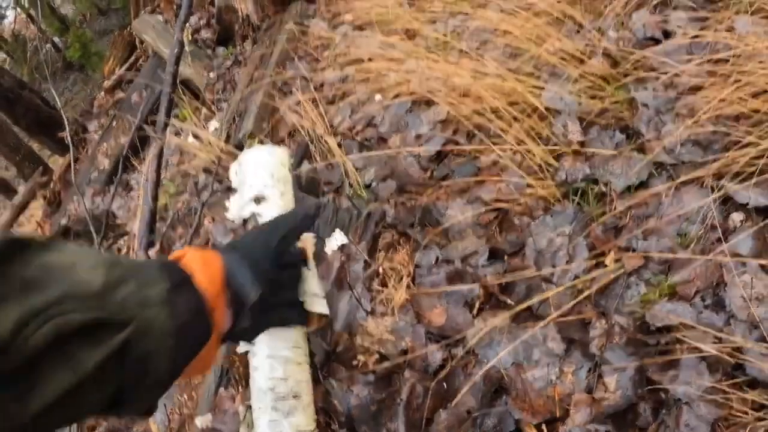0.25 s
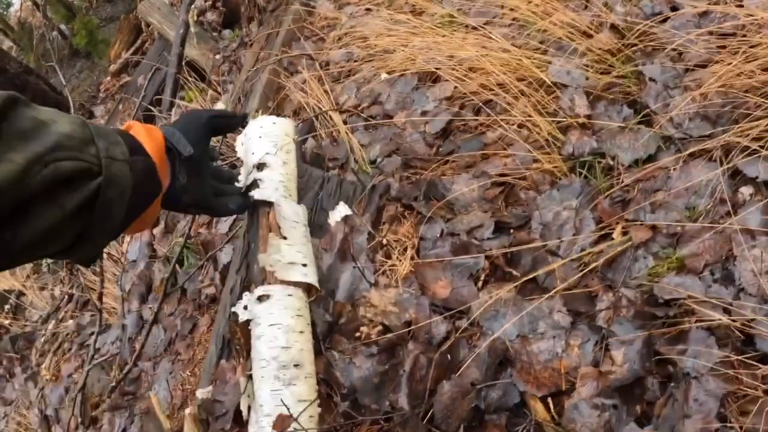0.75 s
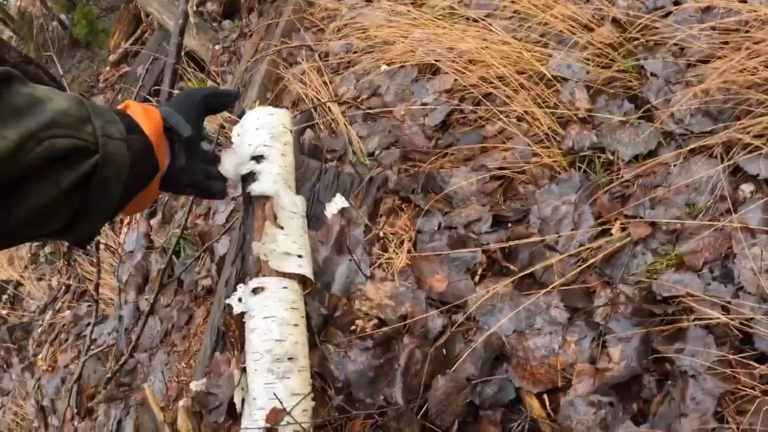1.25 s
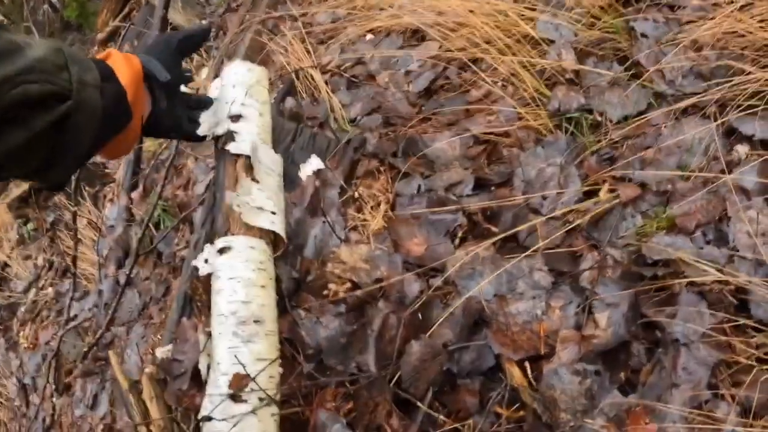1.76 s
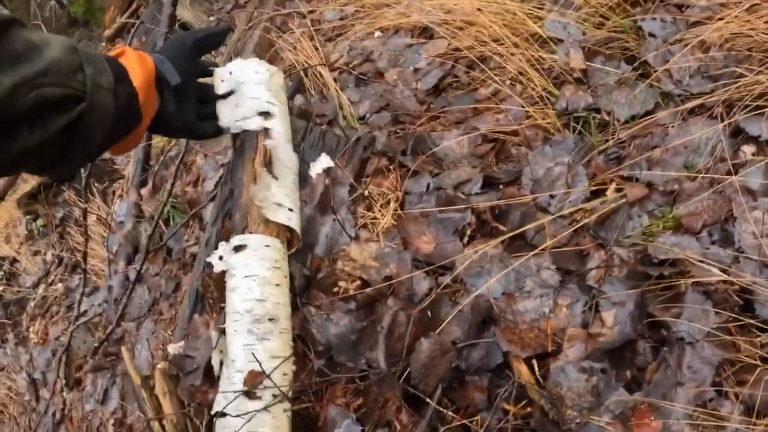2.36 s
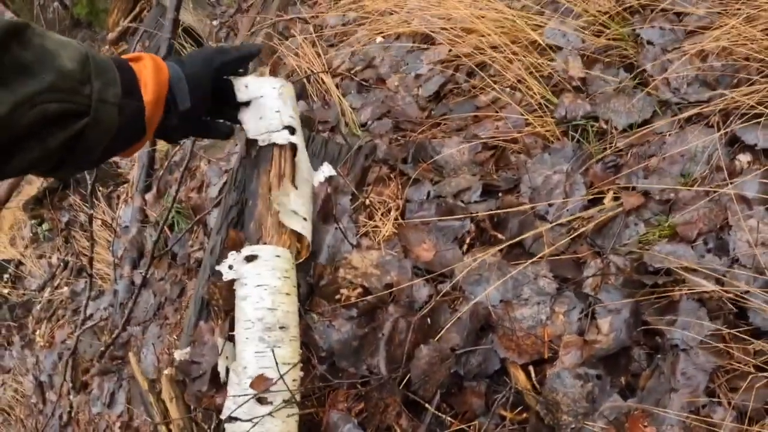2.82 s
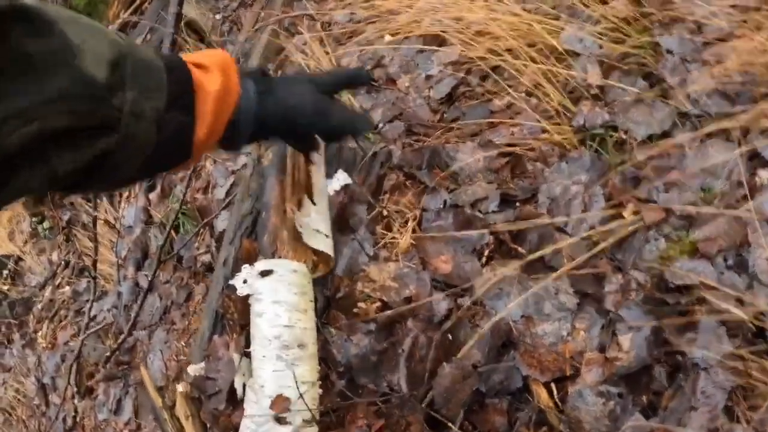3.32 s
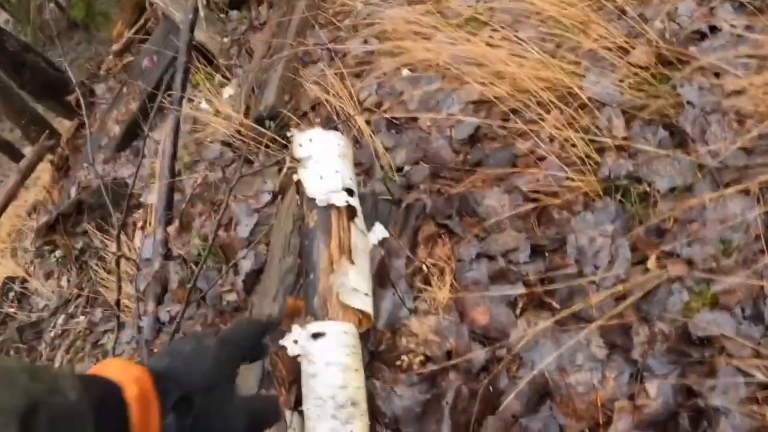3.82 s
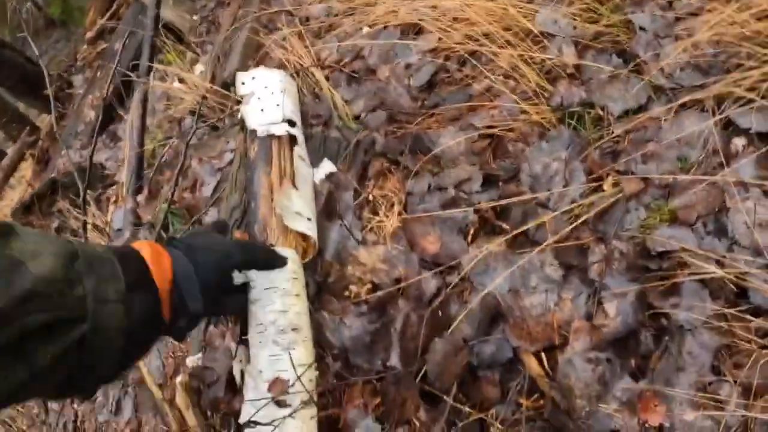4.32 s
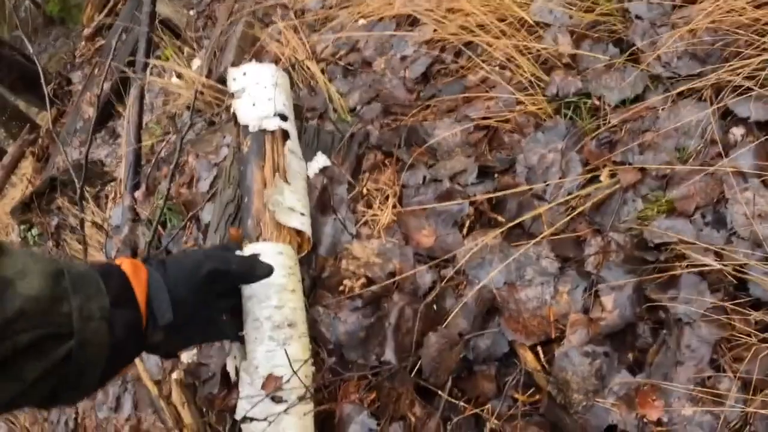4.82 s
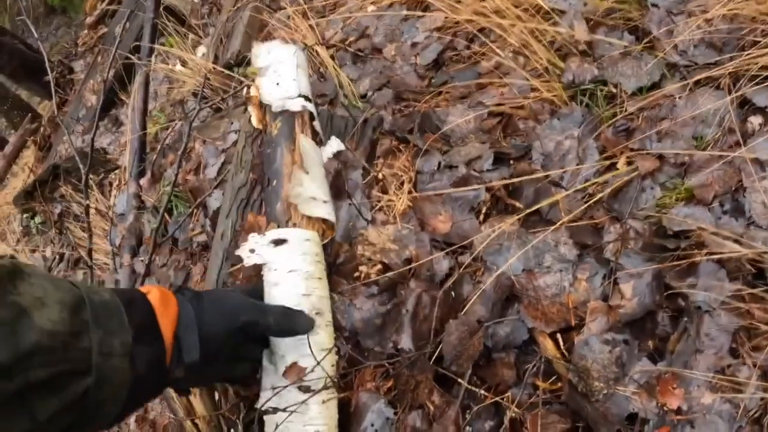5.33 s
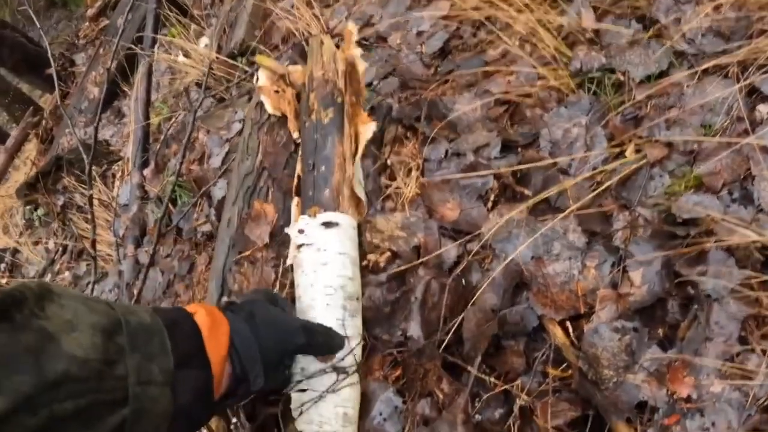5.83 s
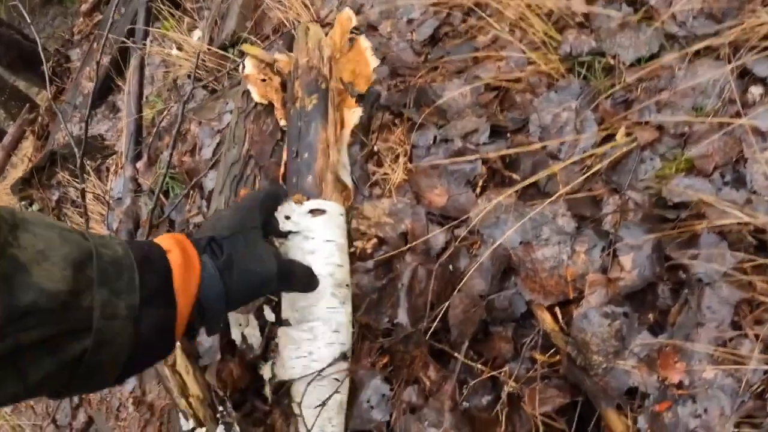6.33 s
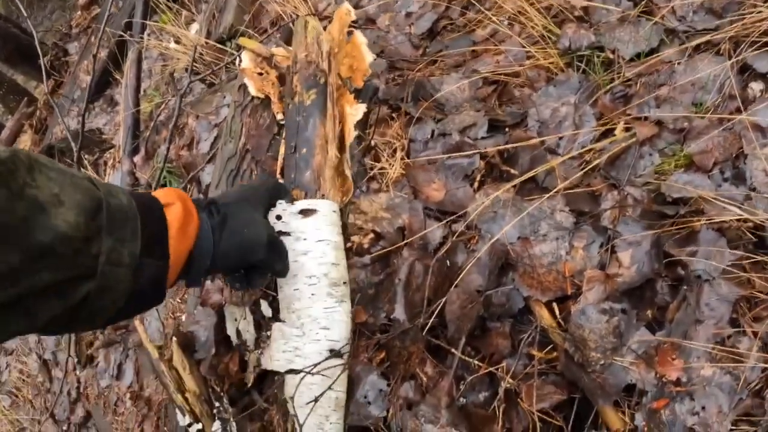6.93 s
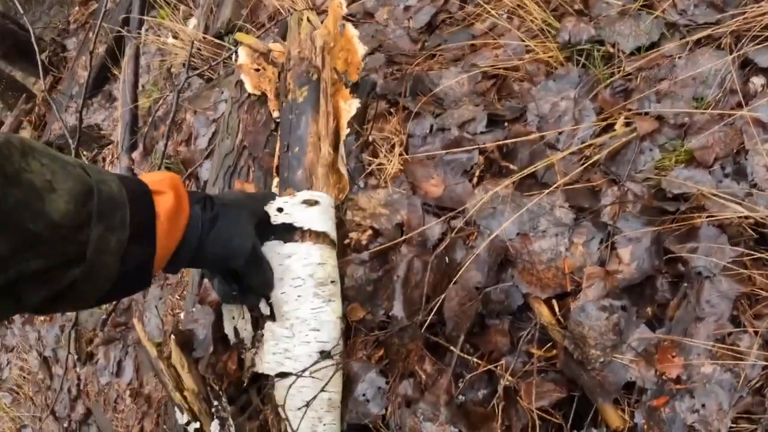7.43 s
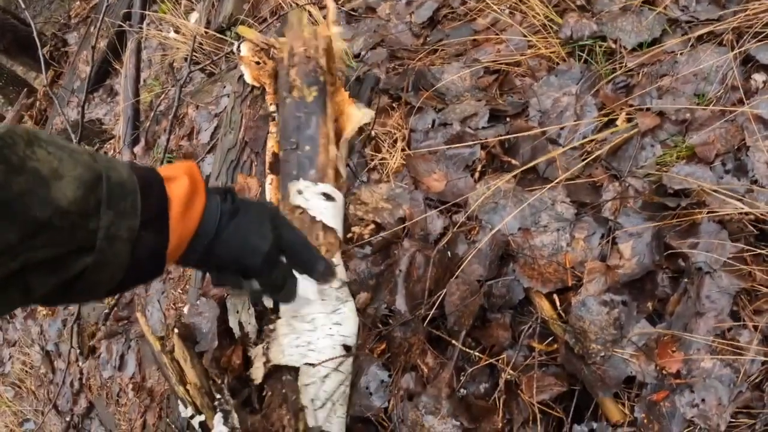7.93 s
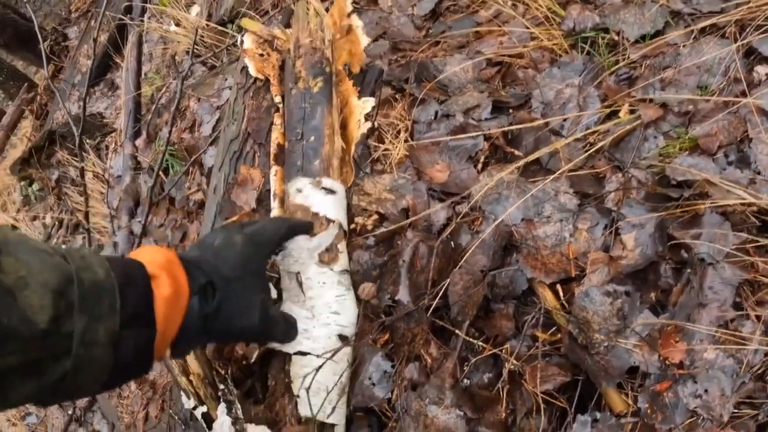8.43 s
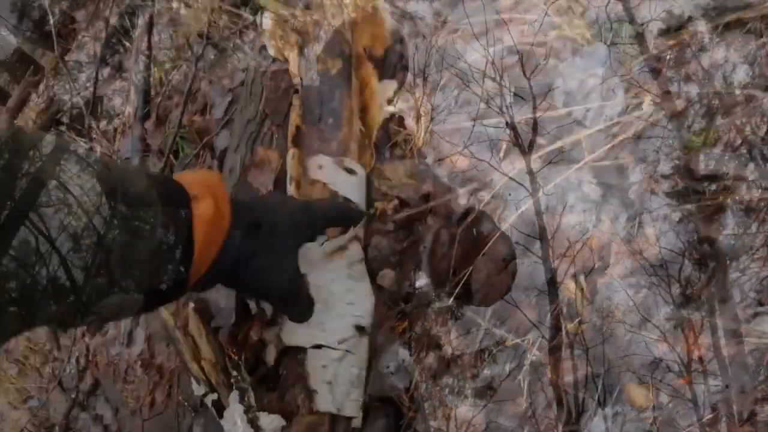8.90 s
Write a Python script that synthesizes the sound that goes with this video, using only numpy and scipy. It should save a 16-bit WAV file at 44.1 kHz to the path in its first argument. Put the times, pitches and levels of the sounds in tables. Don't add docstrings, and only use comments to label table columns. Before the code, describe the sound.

Dry papery bark is tugged, then ripped from a rotten branch in sharp crackling snaps, with sleeve swishes and low wind rumble.

```python
import sys
import numpy as np
from scipy import signal
from scipy.fft import rfft, irfft
from scipy.io import wavfile
from scipy.ndimage import uniform_filter1d

SR = 44100
rng = np.random.default_rng(int(sys.argv[2]) if len(sys.argv) > 2 else 0)


def nominal_scale(level):
    x = np.asarray(level, float) / 20
    return 10 ** x


def store_wav(level_fs):
    pcm = np.round(np.clip(np.atleast_2d(level_fs), -1, 1) * 32767)
    wavfile.write(sys.argv[1], SR, pcm.T.astype(np.int16))


N = 403956

# frequency in Hz, likeness from 0 to 1.
CLOTH_LIKENESS = [(60, 0.88), (240, 0.99), (950, 0.53), (3770, 0.21), (15000, 0.078)]
# fastest moment in seconds, swish level in dB, build-up in seconds,
# let-go in seconds.
ARM_REACHES = [(0.0, -50, .1, 0.3), (.4, -53.5, 0.5, 0.22), (.62, -53, 0.19, 0.5), (.81, -47.5, 0.38, 0.12),
               (1.59, -48, 0.19, 0.69), (1.74, -57.5, .25, 0.051), (1.92, -62, .06, .05),
               (2.28, -68, 0.083, 0.072), (3.5, -54, 0.28, 0.34), (3.79, -44, 0.34, 0.18),
               (4.42, -54.5, 0.34, .05)]


def evened(x):
    return x / np.sqrt(np.mean(x ** 2) + 1e-20)


def read(points, hz):
    f, value = np.transpose(points)
    return np.interp(np.log(hz + 1), np.log(f + 1), value)


def add(mix, s, sound):
    part = mix[max(round(s * SR), 0):][:len(sound)]
    part += sound[:len(part)]


def band(x, lo_hz, hi_hz):
    limits = np.clip([lo_hz, hi_hz], 20, SR / 2.2)
    return signal.sosfilt(signal.butter(2, limits, "band", fs=SR, output="sos"), x)


def noise(spectrum, likeness, size, patchy_db):
    hop = size // 4
    hz = np.fft.rfftfreq(size, 1 / SR)
    a, b, c, d, patches = rng.standard_normal((N // hop + 5, len(hz), 5)).T
    patches = uniform_filter1d(patches, size=5, axis=0)
    patches = evened(uniform_filter1d(patches, size=9, axis=1))
    same = np.clip(read(likeness, hz), 0, 1)[:, None]
    left = a + 1j * b
    right = same * left + np.sqrt(1 - same ** 2) * (c + 1j * d)
    z = np.array([left, right]) * nominal_scale(read(spectrum, hz)[:, None] + patchy_db * patches)
    return evened(signal.istft(z, nperseg=size, noverlap=size - hop)[1][:, :N])


def ports(x):
    # frequency in Hz, left minus right in dB.
    tilt = [(1000, 0), (4500, -.3), (8500, 3.2), (14000, 0)]
    lean = nominal_scale(read(tilt, np.fft.rfftfreq(N, 1 / SR)) / 2)
    return irfft(rfft(x) * np.array([lean, 1 / lean]), N)


def gestures(rows):
    reach_over = 1.466
    roundness = 2.04
    t = np.arange(0, N + 128, 64) / SR
    s, db, up, down = np.transpose(rows)[:, :, None]
    away = np.maximum((s - t) / up, (t - s) / down)
    left = np.clip(1 - away / reach_over, 1e-3, 1)
    strongest = (db + 20 * roundness * np.log10(left)).max(0)
    return np.interp(np.arange(N) / SR, t, strongest)


def hand():
    # hardest moment in seconds, scrape level in dB,
    # build-up in seconds, let-go in seconds.
    tugs = [(0.0, -35, .01, 0.013), (.383, -47, 0.13, 0.056), (.73, -65, 0.24, 0.048),
            (1.1, -55, 0.18, 0.15), (1.124, -34.5, 0.0065, 0.0083), (1.355, -57, 0.097, 0.042),
            (1.531, -56, .04, .05), (1.71, -51.5, 0.19, 0.063), (1.87, -51.5, 0.018, 0.15),
            (2.295, -52, 0.045, 0.094), (2.486, -49, 0.17, 0.14), (2.784, -51, 0.14, 0.13),
            (2.941, -44.5, 0.027, 0.081), (3.06, -58.5, .1, 0.098), (3.28, -47.5, 0.011, .02),
            (3.325, -47, 0.047, 0.048), (3.39, -52.5, .02, .04), (3.47, -54.5, 0.79, 0.16),
            (3.622, -49, 0.2, 0.054), (3.74, -50.5, 0.041, 0.36), (4.446, -47, 0.037, 0.062)]
    # hardest moment in seconds, scrape level in dB,
    # build-up in seconds, let-go in seconds.
    pulls = [(4.536, -42, 0.068, 0.34), (4.712, -43, 0.25, 0.02), (4.941, -44, 0.2, 0.13),
             (5.103, -34.5, 0.028, 0.018), (5.204, -37.5, 0.15, 0.43), (5.41, -36, 0.086, 0.059),
             (5.497, -34.5, 0.013, 0.01), (5.61, -34.5, 0.14, 0.085), (5.743, -36, 0.14, 0.21),
             (5.945, -41, 0.045, .015), (5.996, -42, 0.19, 0.15), (6.114, -38, 0.18, 0.12),
             (6.244, -37, 0.14, 0.057), (6.34, -48, 0.24, 0.065), (6.56, -50.5, 0.87, 0.07),
             (6.634, -42, 0.084, 0.064), (6.896, -38, 0.099, 0.052), (7.022, -43, 0.32, 0.2),
             (7.215, -37.5, 0.1, 0.15), (7.337, -38, 0.054, 0.016), (7.445, -48.5, 0.045, 0.65),
             (7.66, -43, 0.098, 0.19), (7.9, -43.5, 0.42, 0.2), (8.02, -38.5, .18, 0.31),
             (8.252, -41.5, 0.11, 0.18), (8.453, -49.5, 0.12, 0.12), (8.685, -47.5, 0.008, 0.13),
             (8.75, -45.5, 0.068, 0.076), (8.95, -50.5, 0.32, 0.29), (9.084, -41, 0.054, 0.16)]
    return nominal_scale(gestures(tugs + pulls))


def breaks():
    # start in seconds, peak in dB, ring in Hz, time to fade 60 dB in seconds,
    # sizzle in dB, dull part in dB (both relative to the peak).
    first_snap = (0.0, -14.5, 2306, -0.5, -9, -4)
    # start in seconds, peak in dB,
    # ring in Hz, time to fade 60 dB in seconds, sizzle in dB relative to the peak.
    thin_flakes = [(1.0562, -25, 5760, 0.0058, -28), (1.0615, -22, 3600, 0.005, -22),
                   (1.0839, -26.5, 3160, 0.01, -36), (1.0941, -10.5, 3260, 0.017, -35),
                   (1.1413, -17, 1920, 0.017, -11), (1.8472, -18.5, 5500, 0.005, 1),
                   (1.8543, -24, 7900, 0.0084, 3), (1.8648, -29.5, 3330, 0.031, -16.0),
                   (1.8891, -28, 4270, 0.0038, -5), (1.9023, -35, 1600, 0.026, -11),
                   (1.9469, -19, 5000, 0.0082, 3.5), (2.9313, -17, 5300, 0.0093, -15),
                   (2.3793, -33.5, 5450, 0.011, 3), (2.4357, -39, 1850.0, 0.017, -12),
                   (2.4746, -25.5, 3850, 0.014, -13), (2.4856, -19, 1670, 0.015, -0.5),
                   (2.8442, -29, 1760, 0.0072, -7), (2.8833, -21.5, 5140, 0.015, -23),
                   (2.9354, -13.5, 3570, 0.018, -5.5), (2.9429, -22, 5470, 0.014, -22),
                   (3.5658, -35, 5130, 0.0056, -23.0), (6.6425, -12, 1550, 0.014, -35),
                   (4.8824, -10.5, 3100, 0.014, -13.5), (4.9481, -25.5, 5280.0, 0.0092, -15),
                   (4.9674, -20.5, 3100, 0.009, 0), (5.6316, -19, 2780.0, 0.0083, -14),
                   (5.641, -12.5, 2720, 0.014, -21), (5.7343, -21, 2740, 0.0146, -20.0),
                   (5.7447, -12, 3820, 0.013, -7), (6.6022, -21, 2830, 0.0094, -27),
                   (6.6408, -6, 3190, 0.012, -13), (7.1012, -15.5, 5000, 0.012, -3.5),
                   (7.3402, -2, 5400, 0.0081, -8), (7.8802, -4.5, 3220, 0.0054, -6),
                   (8.0136, -20, 1750, 0.021, -13.0), (8.032, -9, 6440, 0.0086, -16),
                   (8.1676, -27, 4740, 0.01, -27), (8.3098, -33.5, 3600, 0.009, -11.5),
                   (8.7578, -17, 1700, 0.02, -14), (8.9436, -35, 1850.0, 0.014, -12)]
    curls = [(1.102, -33, 4240.0, 0.0128, -16.0), (1.1069, -24, 5340, 0.0327, -9),
             (1.2576, -37, 3100, 0.0156, -5), (1.9785, -37, 1890, 0.014, -23.0),
             (4.5277, -32, 6800, 0.056, -8), (4.6799, -33, 5000, 0.0143, -20.0),
             (4.6855, -30.5, 2400, 0.012, -17.0), (4.8724, -24, 4310.0, 0.0178, -22.0),
             (5.1049, -18.5, 5230, 0.0084, -2), (5.2982, -17, 4800, 0.0083, -11),
             (5.34, -18.5, 2900, 0.0063, -9), (5.5431, -21, 3900.0, 0.017, 0),
             (5.6046, -25, 2800.0, 0.014, -20.0), (5.6211, -12.5, 1740, 0.011, -25),
             (5.7741, -13, 2820, 0.012, -16), (5.7991, -25.5, 2750, 0.0139, -23.0),
             (5.9484, -28.5, 1780, 0.027, -2), (6.437, -40, 3200, 0.012, -12),
             (5.9954, -19, 2840, 0.014, -16), (6.0077, -15.5, 3880, 0.01, -29),
             (6.0782, -25.5, 3960, 0.0199, -20.0), (6.086, -19.5, 1380, 0.027, -10),
             (6.0982, -13, 1870, 0.012, -30), (6.2498, -19.5, 4600, 0.012, -27),
             (6.8438, -26, 3170, 0.004, -29.0), (7.028, -9.5, 3960, 0.015, -9),
             (7.2162, -23.5, 3880.0, 0.017, -3), (7.2293, -22.5, 4350, 0.0121, -22),
             (7.4838, -36, 4860, 0.0116, -15), (7.5103, -20, 2820, 0.0049, -38),
             (7.5435, -31, 4300, 0.022, -7), (7.6578, -23, 4690, 0.011, -1),
             (7.7705, -31.5, 2940, 0.024, -13), (7.7745, -34, 2970.0, 0.01, -17),
             (8.008, -11.5, 1820, 0.0062, -18), (8.4611, -38.5, 3730, 0.019, -12),
             (8.7453, -22, 2880, 0.0125, -10), (8.7491, -19.5, 5160, 0.032, -19),
             (9.0628, -29.5, 1680, 0.0159, -27), (9.0754, -21.5, 3430, 0.006, -37.0)]
    layers = [(0.3795, -26, 3440, 0.04, -33), (1.2636, -35, 1220, 0.029, -11),
              (2.489, -27, 6900, 0.018, -16), (2.492, -17.5, 4440.0, 0.0053, -5),
              (4.0619, -35, 5630, 0.025, -28), (4.6182, -24, 2100, 0.012, -17),
              (4.712, -32, 5470, 0.019, 3), (4.9314, -28, 2860.0, 0.0084, -17.0),
              (4.9388, -33.5, 3530.0, 0.0256, -15.0), (4.9756, -25, 3080.0, 0.012, -23.0),
              (5.3956, -27, 2020.0, 0.023, -3), (5.4778, -23.5, 2720, 0.02, -8),
              (5.5229, -15.5, 2930.0, 0.008, -4), (5.5507, -18.5, 2980, 0.02, -17.0),
              (5.5661, -24, 3070, 0.0093, 2), (5.7084, -8.5, 3040, 0.0072, -12),
              (5.7199, -13.5, 1620, 0.0073, -23.0), (5.7407, -18, 3250, 0.0098, -21.0),
              (6.1082, -30, 2030, 0.0057, -22.0), (6.1173, -14.5, 2430, 0.0096, -29),
              (6.1318, -28, 1260, 0.011, -27.0), (6.1957, -28, 1660.0, 0.0121, -14),
              (6.2014, -27, 1310.0, 0.07, -12), (6.9019, -18.5, 1700, 0.02, -5),
              (3.1442, -44, 5500, 0.008, 4), (7.2085, -28, 4040, 0.0067, -13),
              (7.2128, -32, 4110.0, 0.0095, -6), (7.2231, -34, 1570.0, 0.014, -20),
              (7.3331, -25, 1850.0, 0.013, -20), (7.6711, -27.0, 5170, 0.0057, -6),
              (7.7605, -9, 1680, 0.0097, -3.5), (7.8167, -28, 1680.0, 0.0045, -1),
              (7.8524, -33, 4130.0, 0.012, -6), (7.9105, -28, 2630, 0.018, -29),
              (7.9553, -1.5, 1920, 0.015, -7), (8.0223, -13, 2750, 0.017, -21),
              (8.1233, -26, 1500, 0.0079, -27), (8.4447, -34, 3010.0, 0.0089, -15.5),
              (8.4563, -33.5, 2410.0, 0.012, -22), (8.9527, -14, 2700, 0.01, -8.5)]
    damp_bark = [(0.2289, -42.5, 1000, 0.015, -23), (1.921, -32, 1200, 0.013, -8),
                 (3.54, -35, 2640, 0.0165, -22.0), (3.5501, -34.5, 1640, 0.033, -21.0),
                 (3.6296, -41, 1510.0, 0.0075, -19.0), (3.7674, -27.5, 2600, 0.02, -21),
                 (4.0518, -39.5, 1170, 0.024, -9), (4.4349, -40, 1094, 0.022, -21.0),
                 (4.4442, -41, 3200, 0.0144, -15.0), (4.9065, -21, 2300, 0.01, -19),
                 (5.2855, -18.5, 1680, 0.026, -26), (5.4044, -19, 1300, 0.008, -22),
                 (5.4139, -31, 1360, 0.011, -4), (5.4199, -19.5, 1690, 0.013, -8),
                 (5.5003, -26, 1720.0, 0.013, -5), (5.6151, -20.5, 4200, 0.05, -3),
                 (5.6645, -25, 1580, 0.011, -23), (5.6906, -22, 1150, 0.01, -19.0),
                 (6.0943, -23, 2080, 0.0077, -26.0), (6.1223, -18.5, 1190, 0.025, -26),
                 (6.1274, -20.5, 1550.0, 0.0068, -10), (6.174, -29, 2150.0, 0.0111, -25.0),
                 (6.2085, -27.5, 3880.0, 0.037, -16.0), (6.2396, -18, 2560, 0.014, -23.0),
                 (7.6195, -32, 900, 0.012, -25), (6.6253, -22, 1227, 0.0073, -27),
                 (6.895, -16, 1200, 0.017, -18), (7.0227, -18.5, 2660, 0.023, -20),
                 (7.1878, -24.5, 1290, 0.022, -25.0), (7.2469, -33, 3940.0, 0.019, -23.0),
                 (7.2574, -22, 2760, 0.0155, -10), (7.2739, -17.5, 2840, 0.0084, -9),
                 (7.7468, -26.5, 2400, 0.0093, -15.0), (7.7962, -31, 1460.0, 0.0062, -26),
                 (7.8308, -28, 1380.0, 0.0059, -31), (7.9049, -26, 1940.0, 0.0161, -18.0),
                 (7.974, -18, 1780, 0.039, -13), (8.0186, -25, 1700.0, 0.038, -14),
                 (8.3334, -24, 2640, 0.018, -21), (9.0893, -28.5, 1050, 0.039, -21)]
    dry_specks = [
        (2.6745, -42, 3500, 0.0072, -7),
        (3.1293, -43.5, 4410, 0.0056, -8),
        (6.7645, -39, 4860, 0.01, -5),
        (6.8885, -22, 5200, 0.018, -12),
    ]
    kinds = (thin_flakes, -23.5), (curls, -13), (layers, -11), (damp_bark, -6), (dry_specks, -23.5)
    return [first_snap] + [(*row, dull_db) for rows, dull_db in kinds for row in rows]


def snaps():
    lead = 220
    ring_span = 1.163
    out = np.zeros((2, N))
    t = (np.arange(1600) - lead + 14) / SR
    s, db, hz, t60, sizzle_db, dull_db = np.transpose(breaks())[:, :, None]
    t60 = np.clip(t60, .003, .1)
    pitches = hz[:, 0]

    grit, chance, dust = rng.standard_normal((len(s), 3, len(t))).transpose(1, 0, 2)
    cracks = grit * (.5 + 1.49 * (chance > 1.9))
    cracks[:, lead - 12] = 2.7
    creak = nominal_scale(-11.0 + 60 * t / np.minimum(0.62 * t60, .007))
    drive = cracks * np.where(t < 0, creak, nominal_scale(-60 * t / t60))
    drive += dust * (t > 0) * nominal_scale(-29 - 60 * t / 0.052)
    spectrum = rfft(drive)
    smooth = np.sqrt(uniform_filter1d(abs(spectrum) ** 2, size=31))
    drive = irfft(spectrum / smooth, len(t))

    ring = np.array([band(row, f / ring_span, f * ring_span) for row, f in zip(drive, pitches)])
    papery = band(drive, 1170, 6700)
    body = np.array([band(row, 45 * np.sqrt(f) / 2.11, 130 * np.sqrt(f)) for row, f in zip(papery, pitches)])
    sizzle = band(band(drive, 6700, 10900), 7230, 13700)
    dull = band(drive, 490, 1060)
    ring_db = 2.5 * np.log2(hz / 4000)
    parts = (ring, ring_db), (body, 2.5), (sizzle, sizzle_db), (dull, dull_db)
    sound = sum(nominal_scale(share) * p / abs(p).max(1, keepdims=True) for p, share in parts)
    sound *= nominal_scale(db + 0.27) / abs(sound).max(1, keepdims=True)

    for at, snap, place in zip(s[:, 0], sound, np.tanh(dust[:, 0])):
        late = .33 * snap + .67 * np.roll(snap, 1)
        skip = max(lead - round(at * SR), 0)
        left, right = (late, snap) if place > -.1 else (snap, late)
        add(out[0], at - lead / SR, left[skip:] * nominal_scale(-.6 * place))
        add(out[1], at - lead / SR, right[skip:] * nominal_scale(.6 * place))
    return out


def crackle():
    per_s, spread_db, level_db = 260, 3, -9
    ticks = rng.random(N) < per_s / SR
    size = nominal_scale(spread_db * np.minimum(rng.exponential(1, N), 4)) * ticks
    which = rng.integers(0, 16, N)
    t, out = np.arange(400) / SR, np.zeros((2, N))
    for k, hz in enumerate(np.geomspace(1300, 7500, num=16)):
        tick = np.sin(2 * np.pi * hz * t) * nominal_scale(-60 * t * hz / 9) * np.minimum(t * hz / 1.2, 1)
        side = (-1) ** k
        out += signal.oaconvolve(size * (which == k), tick)[:N] * nominal_scale([[3.5 * side], [-3.0 * side]])
    return evened(out) * nominal_scale(level_db) * hand()


def scrape():
    # frequency in Hz, level in dB per Hz.
    rasp_colour = [(290, -22.5), (500, -7.5), (843, -4), (1640, -0.5), (2190, -3), (4150, -5.5),
                   (7800, -13), (9200, -19.5), (13000, -29.5), (14800, -70)]
    # frequency in Hz, likeness from 0 to 1.
    near_likeness = [(60, 0.76), (240, 0.58), (950, 0.92), (3770, 0.96), (15000, 0.94)]
    tear_now = rng.random(N) < 260 / SR
    tears = nominal_scale(4.47 * np.minimum(rng.exponential(1, N), 2.5)) * tear_now
    fade = np.exp(-1 / (0.0046 * SR))
    clumps = 2.5 + signal.lfilter([1], [1, -fade], uniform_filter1d(tears, size=30))
    hiss = noise(rasp_colour, near_likeness, size=256, patchy_db=2.5)
    return evened(hiss * clumps) * hand()


def pressed(rasp):
    thin_hz, light_db = 1000, -58
    thin = signal.sosfilt(signal.butter(4, thin_hz, "high", fs=SR, output="sos"), rasp)
    press = hand()
    weight = press / (press + nominal_scale(light_db))
    return thin + weight * (rasp - thin)


def rub():
    # frequency in Hz, level in dB per Hz.
    drag_colour = [(90, -22), (160, 3), (290, 7.5), (450, -6.5), (650, -14.5), (900, -27.5)]
    arm_db, glove_db, rest_db, blur_s = -9.5, -11, -70, 0.017
    arm = nominal_scale(gestures(ARM_REACHES) + arm_db)
    glove = uniform_filter1d(hand(), round(blur_s * SR)) * nominal_scale(glove_db)
    drag = noise(drag_colour, CLOTH_LIKENESS, size=1024, patchy_db=1.2)
    return drag * (arm + glove + nominal_scale(rest_db))


def sleeve():
    # frequency in Hz, level in dB per Hz.
    swish_colour = [(290, -10), (500, 0.5), (700, -8.5), (1000, -2.5), (1110, 4), (1230, -0.5),
                    (1870, -1.5), (2290, -5), (7700, -7.5), (8600, -16), (11000, -16.5), (12100, -12.5),
                    (14000, -21), (16000, -15)]
    swish = noise(swish_colour, CLOTH_LIKENESS, size=512, patchy_db=1.2)
    return swish * nominal_scale(gestures(ARM_REACHES))


def wind():
    # frequency in Hz, level in dB per Hz.
    rumble_colour = [(10, -12), (25, 2), (50, -5.5), (80, -9.5), (130, -20.5), (220, -29), (400, -101)]
    # time in seconds, rumble level in dB.
    gust_levels = [(0.0, -46.5), (.65, -42.5), (1.4, -44), (2.0, -43), (2.5, -42.5), (3.19, -45),
                   (4.17, -38.5), (4.6, -42), (5.05, -40.5), (5.6, -42.5), (6.5, -44), (7.15, -39),
                   (7.57, -45.5), (7.82, -41), (9.16, -47)]
    s, db = np.transpose(gust_levels)
    likeness = [(25, .92), (60, .97), (200, .93)]  # Hz, 0 to 1
    rumble = noise(rumble_colour, likeness, size=4096, patchy_db=.8)
    return rumble * nominal_scale(np.interp(np.arange(N) / SR, s, db))


def air():
    # frequency in Hz, level in dB per Hz.
    air_colour = [(200, -19), (300, 4.5), (433, -11.5), (828, -17), (1120, -7), (6850, -9), (8800, -18),
                  (11200, -23.5), (12000, -18), (13200, -28), (16000, -37)]
    level_db = -63.5
    return noise(air_colour, [(300, .5), (1000, .1)], size=1024, patchy_db=.7) * nominal_scale(level_db)


def knocks():
    # start in seconds, peak in dB, ring of the branch in Hz.
    blows = [(0.226, -30.5, 251), (0.383, -31, 177), (1.708, -28, 146), (1.706, -31, 470),
             (3.268, -35, 143), (3.378, -36.5, 288), (3.443, -31.5, 245), (3.487, -30.5, 280),
             (3.626, -23, 272), (3.3, -45, 418), (3.342, -42.5, 452), (3.405, -43, 594), (3.538, -42, 1000),
             (3.698, -39, 567), (3.761, -35, 310), (4.43, -32, 169), (7.34, -21.5, 194),
             (7.886, -32.5, 232), (7.911, -29, 201), (8.017, -28.5, 350), (8.329, -37, 328)]
    out, t = np.zeros(N), np.arange(2600) / SR
    for s, db, hz in blows:
        turns = hz * (t + 0.17 * 0.0012 * (1 - np.exp(-t / 0.0015)))
        ring = nominal_scale(-60 * t / 0.032) * np.minimum(t / 0.00015, 1) * np.sin(2 * np.pi * turns)
        tick = band(rng.standard_normal(len(t)) * nominal_scale(-60 * t / 0.045), 300, 1500)
        add(out, s + 0.00383, nominal_scale(db) * (ring + nominal_scale(-10.0) * tick / abs(tick).max()))
    return out


def fold():
    # frequency in Hz, level in dB per Hz.
    hollow_colour = [(150, -32), (230, 5), (320, 8.5), (450, -2.5), (900, -19), (1050, -2), (1110, -0.5),
                     (1190, -44)]
    # fastest moment in seconds, hum level in dB, build-up in seconds, let-go in seconds.
    swings = [
        (.52, -53.5, 0.044, .1),
        (.62, -48.5, 0.087, 0.18),
        (.79, -50.5, 0.081, 0.12),
        (1.6, -64, 0.085, .15),
        (3.78, -41, .12, 0.19),
        (3.88, -52, .08, .13),
    ]
    return noise(hollow_colour, CLOTH_LIKENESS, size=2048, patchy_db=2.5) * nominal_scale(gestures(swings))


def chirp():
    whistle = (8.365, .065, -55, 1190)
    s, length, db, hz = whistle
    t, out = np.arange(0, length, 1 / SR), np.zeros(N)
    fuzz = band(rng.standard_normal(len(t)), hz / 1.06, hz * 1.06)
    fuzz = band(fuzz, hz / 1.06, hz * 1.06)
    add(out, s, evened(fuzz) * np.sin(np.pi * t / length) * nominal_scale(db))
    return out


def squeak():
    # time in seconds, level in dB, slip rate in Hz.
    slides = [
        (8.789, -55, 340),
        (8.815, -57, 391),
        (8.85, -52, 470),
        (8.89, -52, 438),
        (8.92, -42.5, 406),
        (8.945, -70, 315),
    ]
    s, db, hz = np.transpose(slides)
    t, out = np.arange(s[0], s[-1], 1 / SR), np.zeros(N)
    waver = 1 + 0.083 * evened(uniform_filter1d(rng.standard_normal(len(t)), size=250))
    turns = np.cumsum(np.interp(t, s, hz) * waver) / SR
    overtones_db = [0, -14, -11]
    slips = sum(nominal_scale(o) * np.sin(2 * np.pi * (k + 1) * turns) for k, o in enumerate(overtones_db))
    grit = band(rng.standard_normal(len(t)), 1030, 1460)
    slips += 5.2 * grit * (1 + np.sin(2 * np.pi * turns))
    add(out, s[0], evened(slips) * nominal_scale(np.interp(t, s, db)))
    return out


def scene():
    branch = ports(snaps() + crackle()) + pressed(scrape()) + rub() + knocks() + squeak()
    return branch + sleeve() + wind() + air() + fold() + chirp()


def low_pass(x):
    return signal.sosfilt(signal.butter(12, 16360, fs=SR, output="sos"), x)


def record(dry):
    edge = signal.butter(16, 16250, fs=SR, output="sos")
    mix = np.clip(signal.sosfiltfilt(edge, dry), -1, 1)
    return low_pass(mix)


dry = scene()
out = record(dry)
store_wav(out)
```